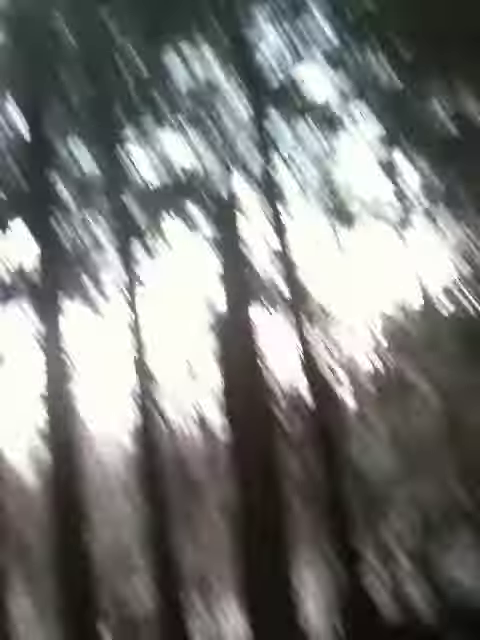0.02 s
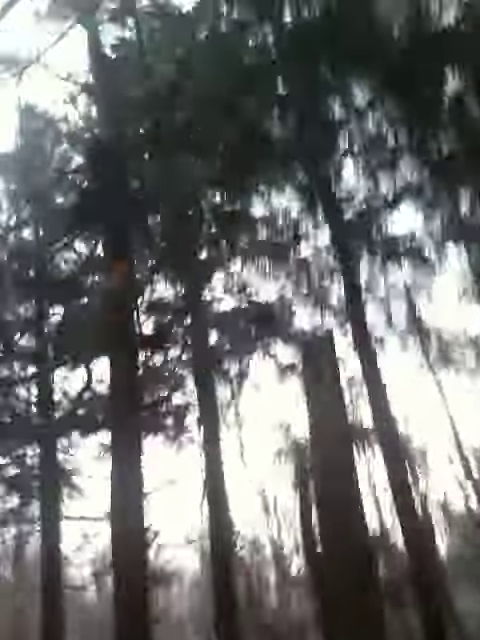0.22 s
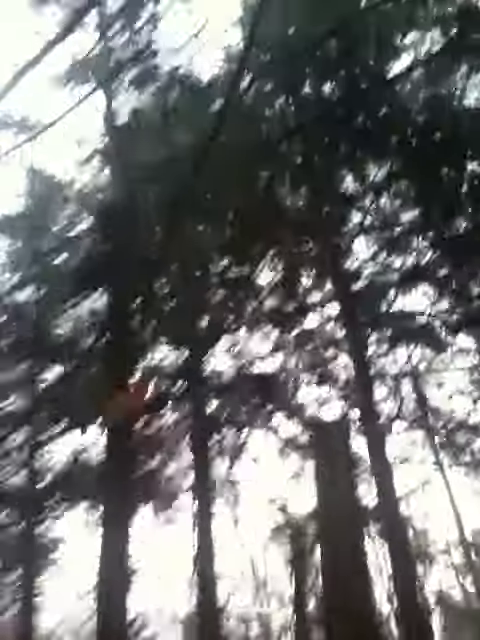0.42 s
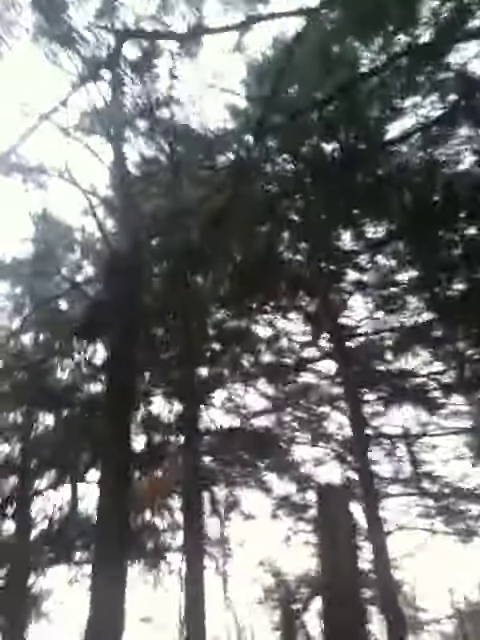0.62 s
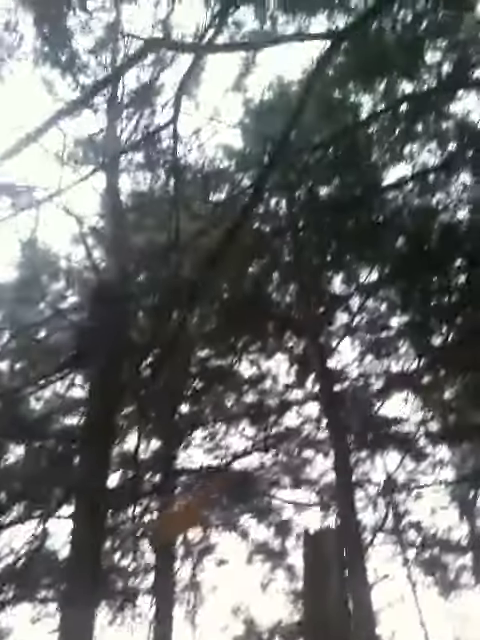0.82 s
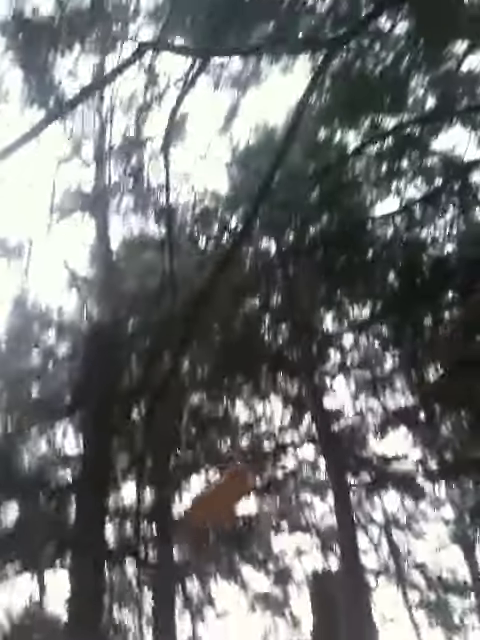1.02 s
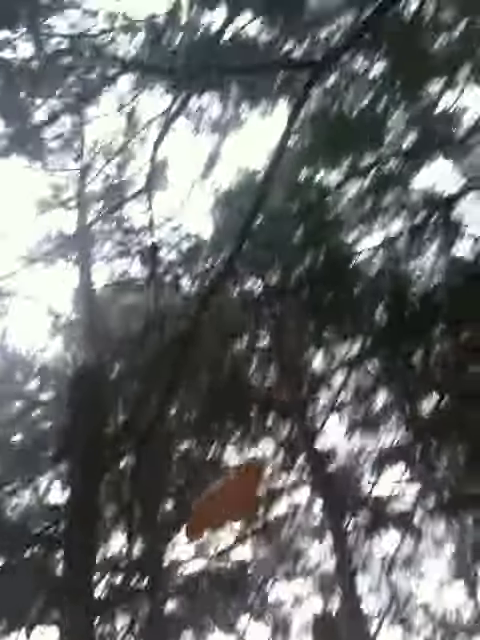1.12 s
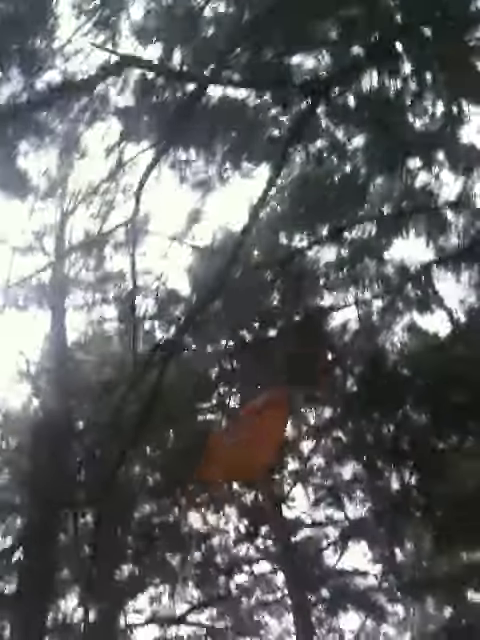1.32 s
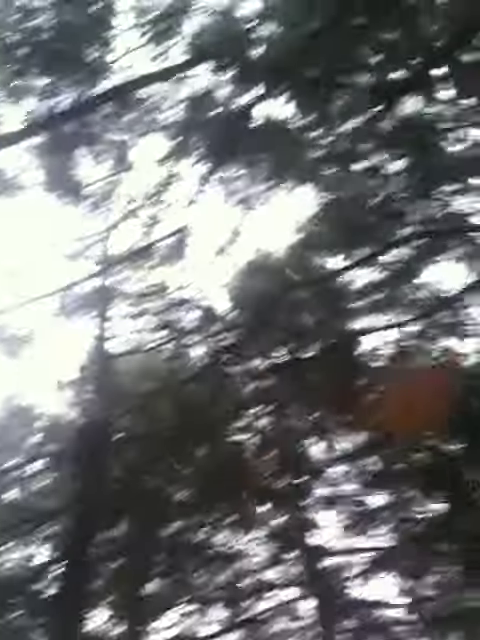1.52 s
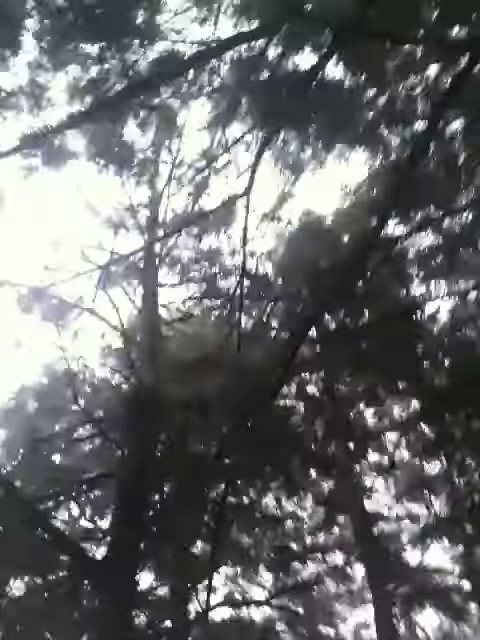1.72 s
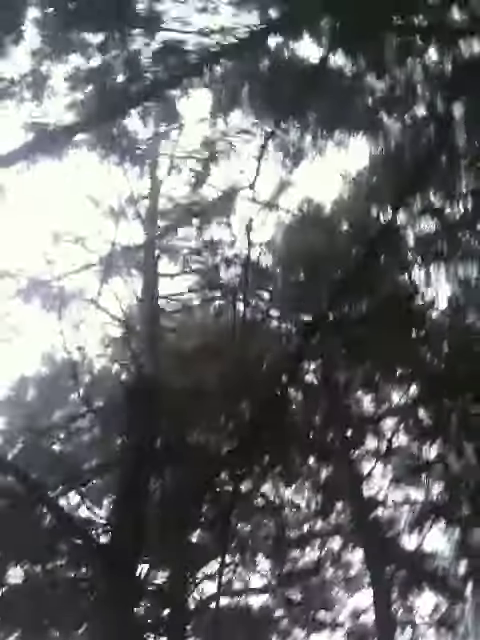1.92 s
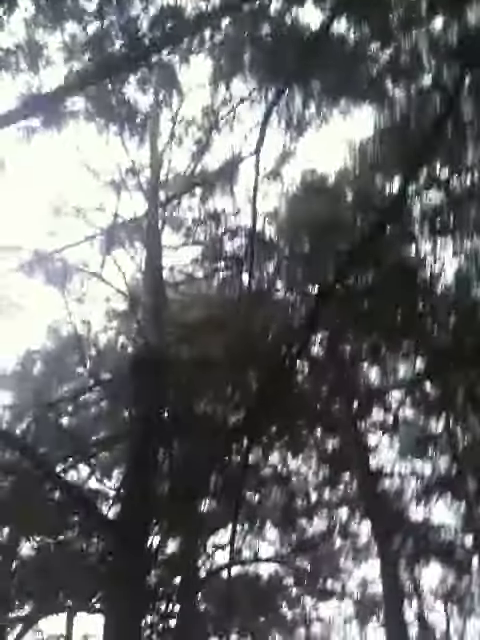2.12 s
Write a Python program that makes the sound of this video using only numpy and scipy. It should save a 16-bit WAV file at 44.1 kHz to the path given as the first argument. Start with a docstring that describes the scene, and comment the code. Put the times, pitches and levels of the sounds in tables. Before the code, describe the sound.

A porcupine whines once, high and wavering, in an echoing forest while twigs snap close by

```python
"""Porcupine whining in a tree

A porcupine whines once: high, sinking to a low hum, up again and falling away. Harmonic partials and
pulsed breath pass a throat filter, and decaying noise makes the forest's echo. Close to the microphone
dry leaves rustle and tick (grains and puffs of noise) and twigs snap (resonant bursts). Soft low bumps
from handling are decaying sines; a lumpy low rumble and faint air are filtered noise."""
import sys
import numpy as np
from scipy import signal
from scipy.io import wavfile
from scipy.ndimage import uniform_filter1d

SR = 44100
rng = np.random.default_rng(int(sys.argv[2]) if len(sys.argv) > 2 else 0)


def gain_from_db(level_db):
    """Convert decibel levels to linear amplitude factors (20 dB per decade)."""
    decades = np.asarray(level_db, float) / 20
    return 10 ** decades


def int16_out(signal):
    """Quantize to a 16-bit WAV file."""
    q = np.round(np.clip(np.atleast_2d(signal).T, -1, 1) * 32767)
    wavfile.write(sys.argv[1], SR, q.astype(np.int16))


N = 97020  # samples, 2.2 s

# relative spectrum of dry litter: freq_hz, gain_db
LEAF_SPECTRUM = [(150, -11.5), (500, -16), (1000, -12.5), (1900, -1), (3600, -5), (6600, 2.5), (11000, -1),
                 (15300, -10.5), (16500, -55)]


def rms_one(x):
    """Normalization: scale to unit root mean square."""
    return x / np.sqrt(np.mean(x ** 2) + 1e-20)


def in_time(rows):
    """Linear interpolation: each column of a curve becomes one value per sample."""
    s, *columns = np.transpose(rows)
    return [np.interp(np.arange(N) / SR, s, c) for c in columns]


def at_hz(points, hz):
    """Logarithmic frequency scale: read a spectrum by interpolating over log frequency."""
    freq_hz, gain_db = np.transpose(points)
    return np.interp(np.log(hz), np.log(freq_hz), gain_db)


def coloured(x, spectrum):
    """Minimum-phase filtering: shape a spectrum causally, with unit response energy."""
    gain = gain_from_db(at_hz(spectrum, np.linspace(1, SR / 2, 513)))
    # the homomorphic method takes a square root, so the gain goes in squared
    linear = signal.firwin2(1023, np.linspace(0, 1, 513), gain ** 2)
    fir = signal.minimum_phase(linear, method="homomorphic")
    return signal.fftconvolve(x, fir / np.sqrt(np.sum(fir ** 2)))[:len(x)]


def filtered(x, order, hz, kind="low"):
    """Butterworth filtering: a maximally flat passband beside a cutoff frequency."""
    return signal.sosfilt(signal.butter(order, hz, kind, fs=SR, output="sos"), x)


def drift(rate_hz):
    """Low-passed random process: a double pole leaves slow fluctuations of rms 1."""
    r = np.exp(-2 * np.pi * rate_hz / SR)
    slow = signal.lfilter([1], [1, -2 * r, r * r], rng.standard_normal(N + SR))
    return rms_one(slow[SR:])


def resonance(x, hz, width_hz):
    """Damped resonator: a pole pair passes a band around its pitch with gain about 1 at the top."""
    r = np.exp(-np.pi * width_hz / SR)
    poles = [1, -2 * r * np.cos(2 * np.pi * hz / SR), r * r]
    return signal.lfilter([(1 - r * r) / 2, 0, (r * r - 1) / 2], poles, x)


def whine():
    """Source-filter principle: harmonics of a gliding pitch and pulsed breath are shaped by the throat."""
    # course of the call: time_s, pitch_hz, level_db, low_partials_db, high_partials_db (extra levels)
    contour = [(.355, 770, -41.5, 7, -53), (.43, 999, -42.5, 6.5, -7), (0.486, 1024, -36.5, 17, 7.5),
               (.56, 991, -48.5, 25, 12.5), (.598, 903.7, -24, -1, -10), (0.631, 687, -27.5, -7, -10),
               (0.656, 502, -27, -3, -15), (0.7, 369.2, -42.5, 17.5, 8), (0.757, 300.8, -66, 25.5, -40),
               (0.828, 359.7, -49, 21, 0), (0.887, 335.3, -52, 19, -11), (0.969, 348.4, -43, 10.5, -21),
               (.995, 454.4, -33.5, 5, -14), (1.029, 781.3, -31.5, -15, -5), (1.069, 941, -30, -1, -3),
               (1.113, 1003, -30, 3, -8), (1.171, 997.7, -28.5, -4, 0), (1.249, 965.3, -27, -4, -5),
               (1.345, 876.5, -33, 10.5, 7), (1.418, 743, -28, 3, -2.5), (1.439, 633.8, -26.5, -4.5, -7),
               (1.462, 345.6, -53.5, 32, -7)]
    # throat and mouth response: freq_hz, gain_db
    throat = [(250, -23.5), (1000, -31), (1450, -18.5), (1950, -1), (2500, -16), (3100, -11), (3900, -4),
              (4700, -14), (5800, -14), (7500, -29.5), (12000, -32)]
    fade_s, glide_s = .016, .016
    low_partials_hz, high_partials_hz = 1112, 4000
    jitter, shimmer_db = .0015, 3  # rms share of the pitch; rms level per partial

    hz, level_db, low_db, high_db = in_time(contour)
    t = np.arange(N) / SR
    gate = np.clip(np.minimum(t - contour[0][0], contour[-1][0] - t) / fade_s, 0, 1)
    hz = uniform_filter1d(hz, int(glide_s * SR))
    # fast glides, in octaves a second, add breath and weaken the upper partials
    glide = np.abs(np.gradient(np.log2(hz))) * SR
    breath_db = -42 + np.minimum(7 * glide, 26)
    fray_db = .8 * np.minimum(glide, 10)
    hz = hz * (1 + jitter * drift(44))
    phase = 2 * np.pi * np.cumsum(hz) / SR
    tone = 0
    for k in range(1, 31):
        partial_hz = k * hz
        low = 1 / (1 + (partial_hz / low_partials_hz) ** 4)
        high = 1 / (1 + (high_partials_hz / partial_hz) ** 4)
        unsteady_db = (1 - low) * (shimmer_db * drift(35.0) - fray_db)
        db = at_hz(throat, partial_hz) + low * low_db + high * high_db + unsteady_db
        tone = tone + gain_from_db(db) * (partial_hz < 12500) * np.sin(k * phase)
    # breath pulses once a cycle
    breath = coloured(rng.standard_normal(N) * (1 + np.cos(phase)), throat)
    return gate * gain_from_db(level_db) * (tone + gain_from_db(breath_db) * breath)


def forest(call):
    """Diffuse reverberation: near branches smear the call, far trunks scatter it into a dull tail."""
    near_t60_s, near_db = .12, -9
    far_t60_s, far_db, far_cut_hz = 0.82, -15, 2680
    t = np.arange(SR) / SR
    near, far = rng.standard_normal((2, SR)) * gain_from_db(-60 * t / [[near_t60_s], [far_t60_s]])
    far = filtered(far, 2, far_cut_hz)
    tail = gain_from_db(near_db) * rms_one(near) + gain_from_db(far_db) * rms_one(far)
    return signal.fftconvolve(call, tail / np.sqrt(SR))[:N]


def snaps():
    """Impulsive fracture: each twig's burst excites a ring, with broad crack, debris and a thud."""
    # twig snaps; thud_db is against the ring's peak: start_s, ring_peak_db, ring_hz, burst_s, thud_db
    twigs = [(0.0676, -20, 6900, 0.0017, -43), (.109, -26, 8300, 0.0022, -46),
             (0.217, -30, 5940, 0.00033, -4.5), (0.235, -14.5, 8000, 0.00015, -44),
             (0.241, -21.5, 5360, 0.0033, -14.5), (0.268, -28, 2503, 0.00077, 15.5),
             (0.3192, -27.5, 5970, 0.006, -13), (0.357, -22.5, 7800, 0.0025, -8),
             (0.397, -23.5, 7500, 0.00025, -10), (0.4037, -3.5, 11200, 0.00057, -47),
             (0.4805, -27.5, 7800, 0.00081, -4.5), (0.565, 7.5, 7764, 0.00085, -55),
             (0.5679, -13.5, 6650, 0.00018, -40), (0.5957, 1, 7890, 0.00077, -19.5),
             (1.24, -44.5, 1940, 0.0019, 7), (1.265, -30.5, 2099, 0.00081, -14),
             (1.7412, -41, 6000, 0.0039, 2), (1.886, -53.5, 6360, 0.00093, 12.5)]
    broad_db, debris_db, debris_s = -10.5, -21.5, 0.0045
    thud_hz, thud_s = 589, 0.00072
    ring_width, thud_width = .3, 1.3  # bandwidth as a share of the pitch

    out = np.zeros(N + SR)
    t = np.arange(int(.06 * SR)) / SR
    noise = rng.standard_normal((len(twigs), 3, len(t)))
    for (s, db, hz, burst_s, thud_db), (ring_noise, crack_noise, thud_noise) in zip(twigs, noise):
        shape = np.exp(-(t / burst_s) ** 2) * np.minimum(t / 0.00032, 1)  # onset ramp in s
        ring = resonance((ring_noise + np.sin(2 * np.pi * hz * t)) * shape, hz, ring_width * hz)
        envelope = gain_from_db(broad_db) * shape + gain_from_db(debris_db) * np.exp(-t / debris_s)
        crack = coloured(crack_noise * envelope, LEAF_SPECTRUM)
        thud = resonance(thud_noise * np.exp(-t / thud_s), thud_hz, thud_hz * thud_width)
        one = ring / np.abs(ring).max() + crack + gain_from_db(thud_db) * thud / np.abs(thud).max()
        i = int(s * SR)
        out[i:i + len(t)] += gain_from_db(db) * one
    return filtered(out[:N], 2, 348, "high")


def ticks():
    """Transient broadband radiation: single dry leaves crack as short, ringless puffs of treble noise."""
    # leaf cracks, levels before filtering: start_s, level_db
    cracks = [(0.033, -37), (.1597, -28.5), (0.1762, -33), (0.226, -30), (0.9979, -34), (1.05, -36),
              (1.229, -26), (1.2637, -24.5)]
    decay_s, low_cut_hz = .0009, 4530
    t = np.arange(N) / SR
    shape = sum(gain_from_db(db) * (t > s) * np.exp(-np.abs(t - s) / decay_s) for s, db in cracks)
    puffs = coloured(shape * rng.standard_normal(N), LEAF_SPECTRUM)
    return filtered(puffs, 2, low_cut_hz, "high")


def rustle():
    """Granular noise: random tiny cracks of uneven size lie on a smoother swish."""
    # course of the rustling: time_s, level_db
    stirring = [(0, -57), (.055, -51.5), (.066, -36), (.078, -46.5), (.2, -53.5), (.215, -32),
                (.255, -36.5), (.275, -45), (.41, -43), (.559, -47.5), (.57, -25.5), (.6, -46), (.75, -59),
                (.92, -58), (1.02, -48), (1.145, -38), (1.175, -51.5), (1.25, -39), (1.29, -46),
                (1.5, -56.5), (1.745, -56), (1.76, -39.5), (1.815, -40), (1.835, -49), (2.025, -56.5),
                (2.05, -63), (2.2, -67.5)]
    base_grains_per_s, grain_s = 800, .0005
    spread_db, smooth_db = 3.9, -1  # size step; swish against the grains

    level_db, = in_time(stirring)
    born = rng.random(N) < base_grains_per_s * gain_from_db(4 * drift(30)) / SR
    sizes = born * gain_from_db(spread_db * np.minimum(rng.exponential(1, N), 2.95))
    r = np.exp(-1 / (grain_s * SR))
    grains = rms_one(signal.lfilter([1], [1, -r], sizes) * rng.standard_normal(N))
    mix = grains + gain_from_db(smooth_db) * rng.standard_normal(N)
    return gain_from_db(level_db) * rms_one(coloured(mix, LEAF_SPECTRUM))


def bumps():
    """Damped oscillation: each soft handling knock is a low sine dying exponentially."""
    # knocks, levels before decay and onset: start_s, level_db, pitch_hz
    knocks = [(0.067, -42.5, 230), (0.28, -34.5, 164), (0.4, -30, 304), (1.237, -39, 246.6)]
    t60_s, onset_s = 0.026, 0.0017
    out = np.zeros(N + SR)
    t = np.arange(int(.2 * SR)) / SR
    for s, db, hz in knocks:
        i = int(s * SR)
        envelope = gain_from_db(db - 60 * t / t60_s) * np.minimum(t / onset_s, 1)
        out[i:i + len(t)] += envelope * np.sin(2 * np.pi * hz * t)
    return out[:N]


def rumble():
    """Amplitude-modulated band noise: a broad low resonance swells and sinks in random lumps."""
    # course of the rumble, before the lumps: time_s, level_db
    course = [(0, -89), (.3, -57), (.8, -108.5), (1.25, -68.5), (2.2, -81)]
    centre_hz, lumps_db = 163, 6
    level_db, = in_time(course)
    noise = rms_one(resonance(rng.standard_normal(N), centre_hz, centre_hz * 2.0))
    return gain_from_db(level_db + lumps_db * drift(36)) * noise


def air():
    """Stationary noise: white noise through a fixed spectrum gives a faint steady hiss."""
    # relative spectrum of the air: freq_hz, gain_db
    air_spectrum = [(40, -2.5), (2000, 1.5), (16000, -20)]
    return gain_from_db(-71) * rms_one(coloured(rng.standard_normal(N), air_spectrum))


def scene():
    """Superposition: call, echo, undergrowth, handling, rumble and air add linearly."""
    call = whine()
    undergrowth = snaps() + ticks() + rustle()
    return (call + forest(call) + undergrowth + bumps() + rumble() + air())[None]


def low_pass(x):
    """Removes everything above the highest recorded frequency."""
    return signal.sosfilt(signal.butter(12, 16800, fs=SR, output="sos"), x)


def record(dry):
    """Band limiting and saturation: bass is thinned, peaks are rounded and the top is cut."""
    ceiling = .62  # limit of the rounded peaks, full scale 1
    thinned = filtered(dry, 2, 93, "high")
    rounded = ceiling * np.tanh(thinned / ceiling)
    mix = filtered(rounded, 10, 15900)
    return low_pass(mix)


dry = scene()
out = record(dry)
int16_out(out)
```